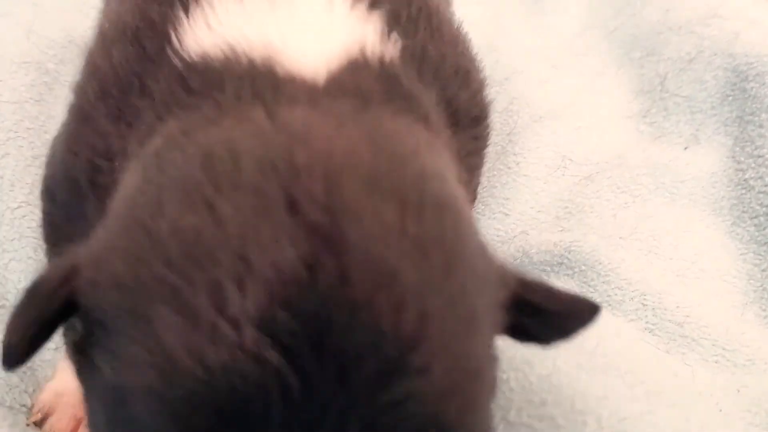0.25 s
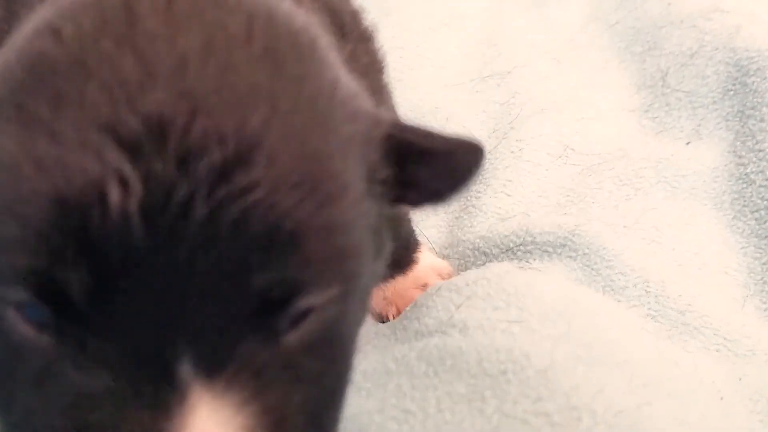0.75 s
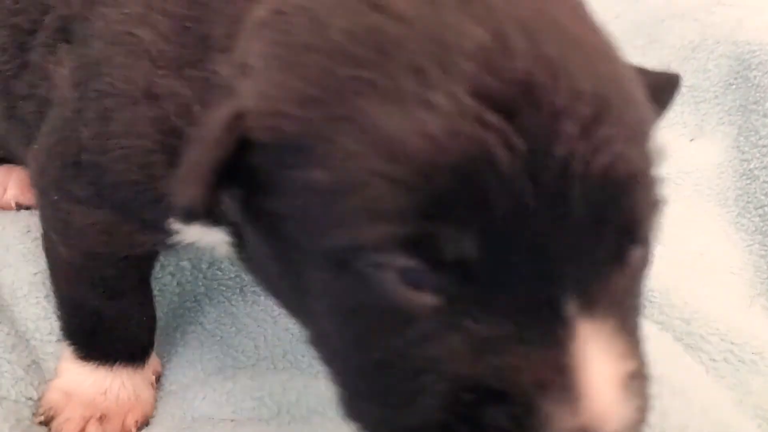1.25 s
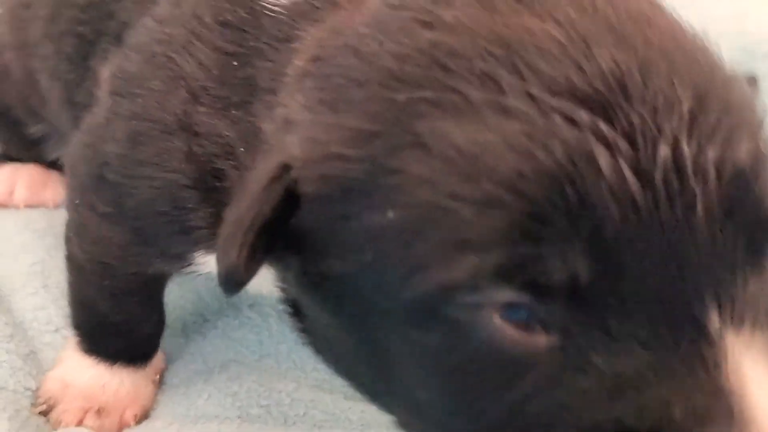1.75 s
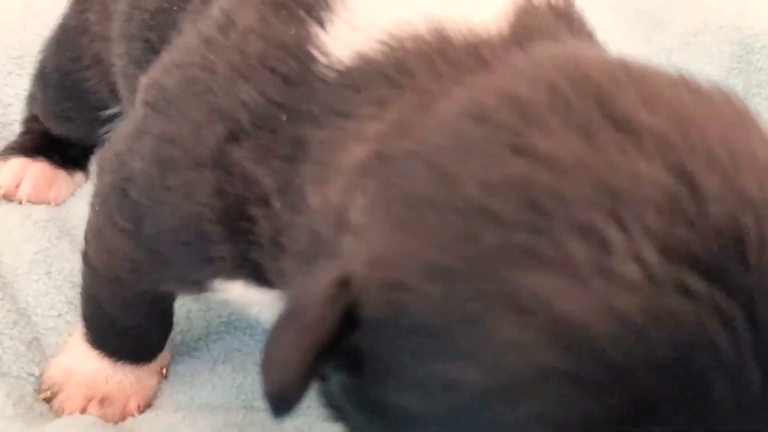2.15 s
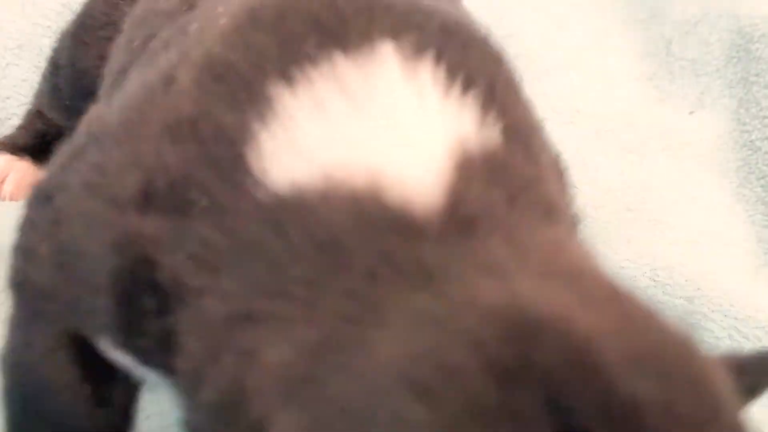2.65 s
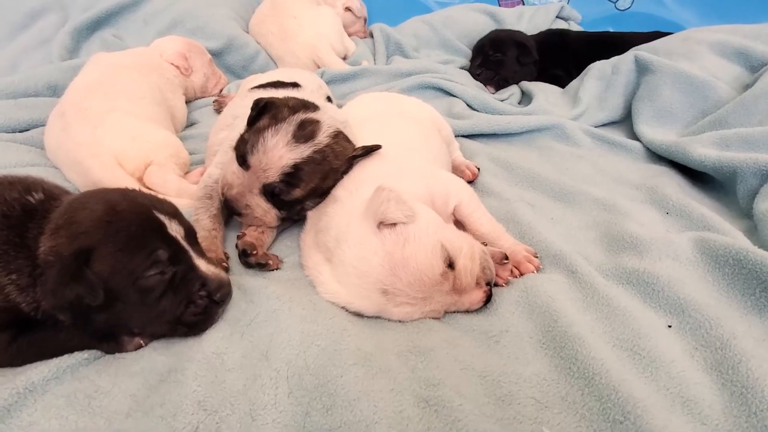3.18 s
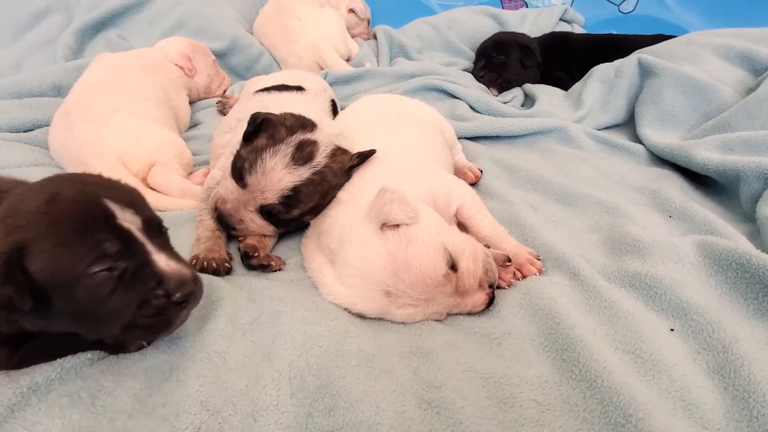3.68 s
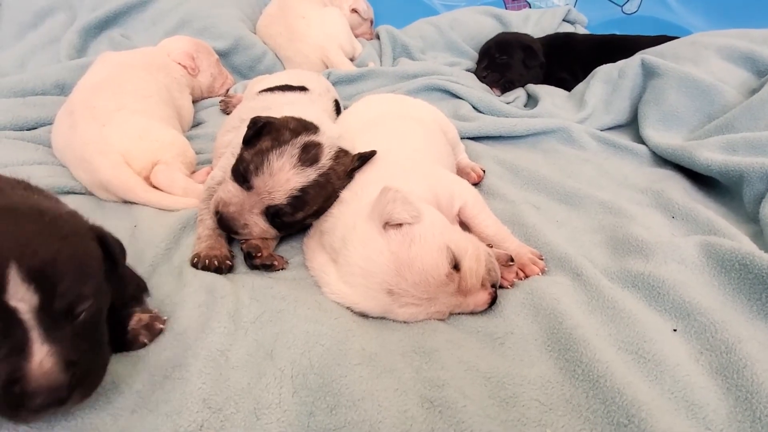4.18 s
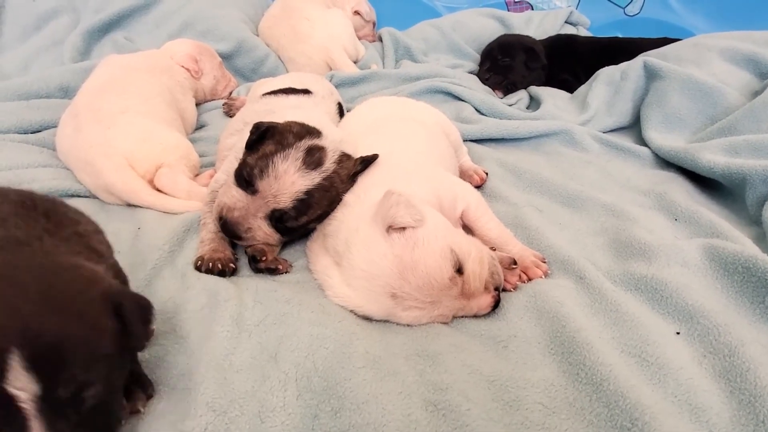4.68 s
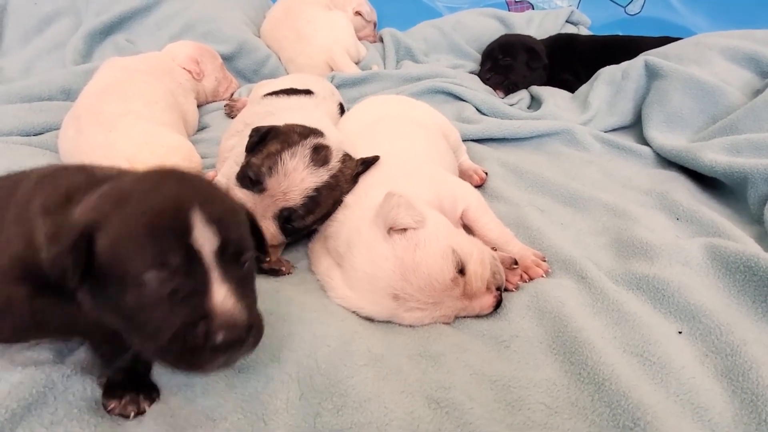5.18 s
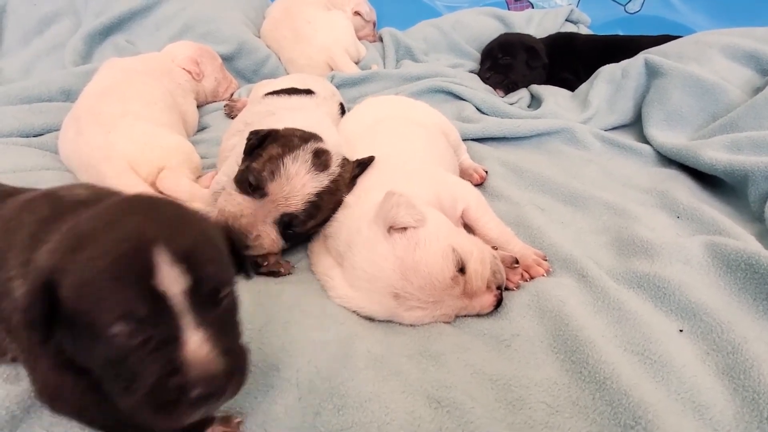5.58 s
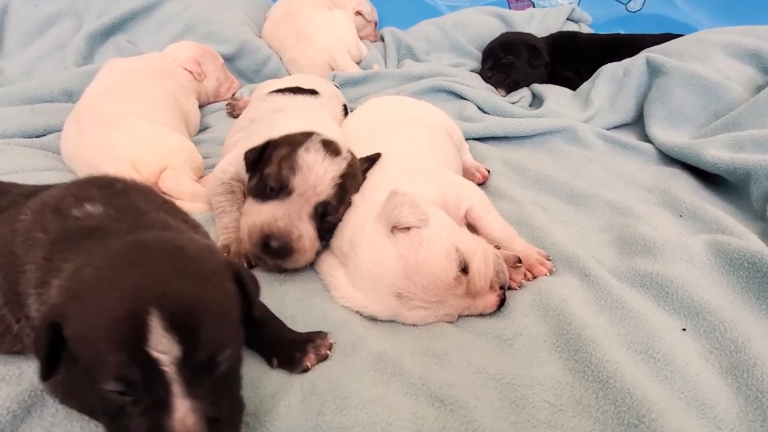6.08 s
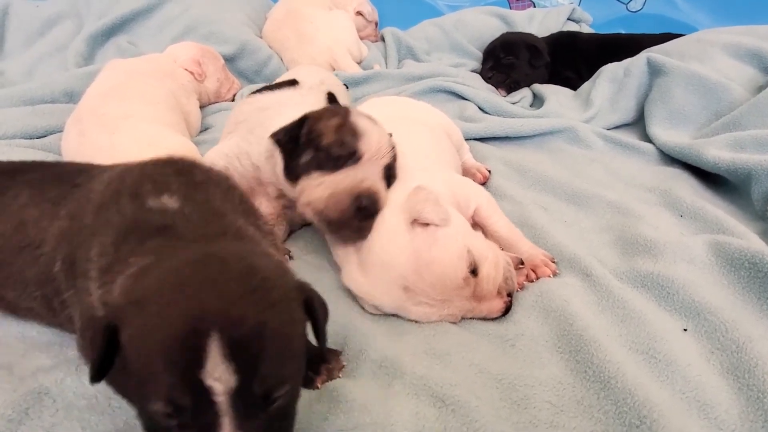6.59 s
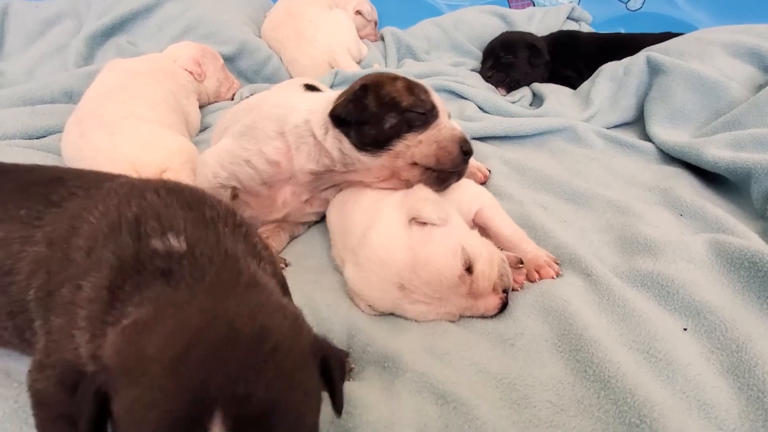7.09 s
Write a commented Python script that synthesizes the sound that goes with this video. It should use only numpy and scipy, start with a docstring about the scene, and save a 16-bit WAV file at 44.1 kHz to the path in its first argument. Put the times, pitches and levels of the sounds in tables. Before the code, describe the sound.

Tiny puppies on a fleece blanket indoors, miked at close range. First come shrill, trembling cries around a thousand hertz with throaty croaks, brief squeaks and breathy hoarse air. After an abrupt tiny gap it turns much quieter: nasal sniffing puffs about four times a second, occasional little whimpered yips, blanket rustle, and muffled thuds that grow stronger near the end, with a short room echo.

```python
"""Five high wavering cries of a newborn puppy, heard very close, while another creaks and squeaks hoarsely.
After a brief break in the sound a puppy whimpers in short yips, amid hisses of air through the nose.
Voices are sums of harmonics or pulses through resonances; air is filtered noise; ticks are ringing bursts.
Dull thuds and the rubbing of a fleece blanket are swelling noise, over low hums, room hiss and a short echo."""
import sys
import numpy as np
from scipy import signal
from scipy.fft import rfft, irfft, next_fast_len
from scipy.io import wavfile

SR = 44100
rng = np.random.default_rng(int(sys.argv[2]) if len(sys.argv) > 2 else 0)


def dump(signal):
    """Clip the signal to [-1, 1] and save it as 16-bit WAV at the path in sys.argv[1]."""
    limited = np.clip(np.atleast_2d(signal).T, -1, 1)
    pcm = np.round(limited * 32767).astype(np.int16)
    wavfile.write(sys.argv[1], SR, pcm)


N = 323694
TIME = np.arange(N) / SR
CUTOFF_HZ = 15900   # top of the audible band kept
FADE_DB = 30        # attacks and releases are timed over this range


def from_db(db):
    """Logarithmic level: decibels to amplitude gain."""
    return 10 ** (np.asarray(db) / 20)


def rms_one(x):
    """Normalisation: scale to unit power."""
    return x / np.sqrt(np.mean(x ** 2) + 1e-20)


def in_time(rows, t=TIME):
    """Linear interpolation: each column of a curve against its first column."""
    knots, *columns = np.transpose(rows)
    return [np.interp(t, knots, column) for column in columns]


def gain_at(points, hz):
    """Spectral envelope: gain interpolated in dB over log frequency."""
    f, db = np.transpose(points)
    return from_db(np.interp(np.log(hz + 1), np.log(f), db))


def butter(x, hz, kind, order=2):
    """Causal filtering with a maximally flat passband."""
    return signal.sosfilt(signal.butter(order, hz, kind, fs=SR, output="sos"), x)


def wobble(count, hz):
    """Random modulation: noise low-passed at hz, with spread near 1."""
    slow = butter(rng.standard_normal(count + SR // 2), hz, "low")
    return rms_one(slow[SR // 4:])[-count:]


def resonate(x, hz, width_hz):
    """Damped resonance: a pole pair with gain 1 at its peak."""
    r = np.exp(-np.pi * width_hz / SR)
    zeros = np.array([1, 0, -1]) * (1 - r * r) / 2
    poles = [1, -2 * r * np.cos(2 * np.pi * hz / SR), r * r]
    return signal.lfilter(zeros, poles, x + 1e-18)


def noise(spectrum, alike):
    """Interchannel correlation: coloured mid and side noises mixed to a left-right likeness; overall rms 1."""
    hz = np.arange(N // 2 + 1) * SR / N
    mid, side = irfft(rfft(rng.standard_normal((2, N))) * gain_at(spectrum, hz), N)
    return rms_one(np.sqrt(1 + alike) * mid + np.sqrt(1 - alike) * side * [[1], [-1]])


def add(track, start_s, sound):
    """Superposition: mix a sound into a track."""
    at = max(round(start_s * SR), 0)
    track[at:at + len(sound)] += sound[:N - at]


def gate(t, start, end, edge_s):
    """Smooth switching: opens at start and closes at end along sine-squared edges."""
    return np.sin(np.pi / 2 * np.clip(np.minimum(t - start, end - t) / edge_s + .5, 0, 1)) ** 2


def swells(rows, attack_s, release_s):
    """Exponential envelope: each gesture sets in, changes evenly in dB to its final level and dies away."""
    out = np.zeros(N)
    for start, end, level_db, swell_db in rows:
        corners = [start - attack_s, start, end, end + release_s]
        t = np.arange(max(corners[0], 0), corners[-1], 1 / SR)
        course_db = np.interp(t, corners, [-swell_db - FADE_DB, -swell_db, 0, -FADE_DB])
        add(out, t[0], from_db(level_db + course_db))
    return out


# Colour of the room hiss. Each row: frequency in Hz, relative level in dB.
HISS_SPECTRUM = [(88, -33.5), (150, -4), (361, -13.5), (589, -10.5), (1190, -24.5), (1940, -24),
                 (4580, -30.5), (6770, -23.5), (11500, -31), (13700, -31.5), (16000, -27.5)]


def room_hiss():
    """Diffuse field: the steady hiss of a still room, nearly independent left and right."""
    return from_db(-72.5) * noise(HISS_SPECTRUM, alike=0.2)


def mains_hum():
    """Pure tone: a faint steady mains hum at 120 Hz."""
    return from_db(-75) * np.sin(2 * np.pi * 120 * TIME)


def low_hum():
    """Slow frequency and amplitude modulation: a wavering hum near 71 Hz, stronger right and growing midway."""
    level_db = np.interp(TIME, [2.7, 5.3], [-72, -64]) + 2 * wobble(N, 3)
    pitch = 71.4 + .8 * wobble(N, 4)
    tone = np.sin(2 * np.pi * np.cumsum(pitch) / SR)
    return from_db(level_db) * tone * from_db([[-4], [3]])   # left, right


# Dull low thuds, like breath puffing on the microphone.
# Each row: start in seconds, level in dB before the left-right balance.
THUDS = [(.26, -69), (.53, -68), (.65, -61), (1.16, -55), (1.73, -51.5), (2.0, -58), (2.179, -56.5),
         (2.42, -71), (2.721, -55), (3.21, -49), (4.491, -69), (4.71, -60.5), (6.079, -65), (6.73, -54),
         (6.961, -47.5), (7.14, -49), (7.24, -56)]
# Low rumble under the thuds, growing overall towards the end.
# Each row: time in seconds, level in dB before the left-right balance.
RUMBLE_LEVEL = [(0, -78), (2.9, -71.5), (4.6, -75), (5.4, -69), (7.34, -65)]
# Colour of thuds and rumble. Each row: frequency in Hz, relative level in dB.
RUMBLE_SPECTRUM = [(15, -43), (25, -22.5), (51, 7), (78, 5), (130, -5.5), (200, -17.5), (260, -47.5),
                   (440, -120)]


def thuds_and_rumble():
    """Envelope-shaped noise: dull low-frequency bursts over a continuous rumble."""
    gestures = [(start, start + 0.01, level_db, 0) for start, level_db in THUDS]
    bursts = swells(gestures, attack_s=0.036, release_s=0.11)
    strength = bursts + from_db(in_time(RUMBLE_LEVEL)[0])
    return strength * noise(RUMBLE_SPECTRUM, alike=0.646) * from_db([[-4], [2.5]])   # left, right


# Paws and bellies on the fleece. Each row: start and end in seconds, final level in dB, swell in dB.
RUBS = [(2.8, 3.0, -74, -0.5), (3.2, 3.3, -75, -14), (3.56, 3.65, -71.5, -7.5), (3.9, 3.98, -75, -5),
        (4.7, 4.95, -70, 2.5), (5.08, 5.23, -66.5, 10.5), (7.13, 7.3, -69, -7)]
# Colour of the rubbing. Each row: frequency in Hz, relative level in dB.
RUBBING_SPECTRUM = [(88, -23), (150, 2.5), (469, -9), (846, -14), (912, -26.5), (1960, -29.5), (2140, -27),
                    (3000, -35.5), (3900, -62), (6600, -120)]


def fleece_rubbing():
    """Friction noise: irregular contact makes the rustle patchy."""
    patchy = from_db(3 * wobble(N, 21))
    return swells(RUBS, attack_s=.15, release_s=0.2) * patchy * noise(RUBBING_SPECTRUM, alike=0.85)


# Claw and mouth ticks. Each row: start in seconds, peak level in dB, ringing frequency in Hz.
TICKS = [(0.38, -50.5, 6950), (0.417, -41, 7230), (2.779, -48, 5560), (2.846, -46.5, 11000),
         (3.558, -40.5, 10100), (3.576, -54, 7240), (3.606, -57, 5900), (3.689, -51.5, 7650),
         (3.959, -54, 7600), (4.102, -50.5, 9030), (5.174, -65, 7100), (5.204, -47, 7700)]


def ticks(decay_s, width_hz):
    """Impulse response: a tiny noise burst rings one broad high resonance."""
    out, t = np.zeros(N), TIME[:SR // 50]
    for start, peak_db, hz in TICKS:
        burst = rng.standard_normal(len(t)) * np.exp(-t / decay_s)
        snap = resonate(burst, hz, width_hz)
        add(out, start, from_db(peak_db) * snap / np.abs(snap).max())
    return out


# Puffs through the nose. Each row: start and end in seconds, final level in dB, swell in dB.
NOSE_AIR = [(2.84, 2.89, -59, 7.5), (3.02, 3.22, -56, 19.5), (3.43, 3.59, -59, 8.5), (3.80, 3.89, -62, 6),
            (4.11, 4.16, -64.5, 0), (4.36, 4.39, -75, 3), (4.54, 4.58, -73, 6), (4.82, 4.86, -75, -6),
            (5.05, 5.10, -56.5, 7.5), (5.36, 5.45, -61, 4.5), (5.63, 5.71, -58, 8), (5.91, 5.99, -65, -3.5),
            (6.16, 6.22, -57.5, 9), (6.39, 6.445, -51.5, 16), (6.64, 6.735, -53, 10.5),
            (6.90, 6.955, -57.5, 11), (7.15, 7.17, -68, -3), (7.25, 7.30, -71, -4)]
# Colour of nose air. Each row: frequency in Hz, relative level in dB.
NOSE_SPECTRUM = [(1470, -11), (2500, -8.5), (2700, -55.5), (3260, -20), (4880, -18.5), (5190, -30),
                 (5520, -4.5), (6400, 6.5), (7950, -6), (9730, 5), (10900, -7), (12300, -3), (13500, -15),
                 (15200, -2), (16000, -23)]


def nose_air():
    """Turbulence: puffs of air hiss through the nose, nearly independent left and right."""
    return swells(NOSE_AIR, attack_s=0.035, release_s=0.02) * noise(NOSE_SPECTRUM, alike=0.066)


# Air forced through hoarse throats. Each row: start and end in seconds, final level in dB, swell in dB.
THROAT_AIR = [(0, .015, -53, -1), (.14, .285, -48, 7), (.51, .83, -53.5, -2), (.97, 1.19, -51.5, -1.5),
              (1.40, 1.765, -64, -10), (1.98, 2.13, -50.5, 2.5), (2.28, 2.33, -54.5, 7),
              (2.40, 2.70, -49, 1)]
# Colour of throat air. Each row: frequency in Hz, relative level in dB.
HOARSE_SPECTRUM = [(880, -14), (1500, -21), (2040, -2), (2590, -9.5), (3770, -31.5), (4370, -26),
                   (5380, -25.5), (6960, -9), (8400, -29.5), (10100, -19), (12900, -23.5), (14100, -33.5),
                   (16000, -29)]


def throat_air():
    """Turbulence: air forced through the hoarse throats hisses in slow swells."""
    return swells(THROAT_AIR, attack_s=0.085, release_s=.08) * noise(HOARSE_SPECTRUM, alike=0.036)


# Slack-fold creaks. Each row: start and end in seconds, first and last pulse rate per second, level in dB.
CREAKS = [(0.089, 0.204, 218, 325, -51.5), (0.219, 0.293, 176, 323, -38.5), (0.47, 0.553, 136, 237, -42),
          (0.76, 0.835, 156, 387, -39.5), (0.931, 0.97, 200, 396, -45.5), (1.069, 1.141, 182, 270, -42),
          (1.344, 1.449, 163, 335, -42.5), (1.666, 1.748, 140, 320, -41.5), (1.93, 2.062, 193, 356, -43),
          (2.254, 2.321, 139, 397, -42.5), (2.355, 2.403, 170, 404, -42)]
# Resonances of the creaking throat. Each row: frequency in Hz, width in Hz, level in dB.
CREAK_MODES = [(310.8, 200, -4), (583, 150, -2), (900, 115, 7), (2400, 330, -6), (6470, 1100, -12)]


def creaks(jitter, uneven_db, rasp, swell_db):
    """Pulse excitation: slack folds slap unevenly, faster and harder with strain, each slap puffing air."""
    out = np.zeros(N)
    for start, end, first_rate, last_rate, level_db in CREAKS:
        size = int((end - start) * SR)
        rate = np.linspace(first_rate, last_rate, size) * np.exp(jitter * wobble(size, 150))
        cycles = np.cumsum(rate) / SR
        slaps = butter(np.diff(np.floor(cycles), prepend=-1), 1300, "low", order=1)   # soft contact
        puffs = rng.standard_normal(size) * np.exp(-2 * (cycles % 1))
        strain_db = uneven_db * wobble(size, 120) - swell_db * np.linspace(1, 0, size) ** 3
        strain = from_db(strain_db) * signal.windows.tukey(size, .25)
        flow = (rms_one(slaps) + rasp * rms_one(puffs)) * strain
        flow = np.pad(flow, (0, SR // 100))   # time to ring out
        voice = 0
        for k, (hz, width_hz, db) in enumerate(CREAK_MODES):
            voice = voice + (-1) ** k * from_db(db) * resonate(flow, hz, width_hz)
        # the nose absorbs these bands
        voice = voice - 0.47 * resonate(voice, 1600, 720) - 1.1 * resonate(voice, 3600, 1800)
        add(out, start, from_db(level_db) * rms_one(butter(voice, 98, "high")))
    return out


# Throat spectrum shared by squeaks and cries. Each row: frequency in Hz, relative level in dB.
THROAT = [(500, 26), (1200, -15), (1500, -5.5), (2100, -0.5), (2550, -8.5), (3000, -12.5), (3800, -25),
          (4300, -23.5), (5200, -32.5)]
# Squeaks among the cries. Each row: start and length in seconds, first and last pitch in Hz,
# fundamental level in dB, overtone level in dB before throat shaping.
SQUEAKS = [(0, .010, 629, 597, -42, -10), (.130, 0.076, 546, 711, -47, -1),
           (.271, 0.016, 909, 760, -33.5, -18.5), (.538, 0.036, 530, 746, -38, -28),
           (.725, 0.025, 855, 855, -30, -26), (.829, .019, 676, 897, -32, -15.5),
           (1.048, 0.017, 916, 846, -44, -40), (1.110, 0.026, 558, 840, -35, -28),
           (1.175, 0.026, 1035, 1013, -31.5, -5), (1.440, 0.014, 738, 910, -34, -23),
           (1.720, 0.022, 577, 840, -38, -4.5), (1.754, 0.011, 939, 893, -28.5, -13),
           (1.990, 0.096, 989.6, 857.4, -38, -8), (2.064, .023, 847, 845, -29.5, -18.5),
           (2.314, 0.017, 738, 864, -34.5, -16.5), (2.497, 0.031, 967, 1062, -32.5, -9.5),
           (2.582, 0.01, 890, 813, -47, -39.5), (2.619, 0.013, 980, 694, -33.5, -39),
           (2.674, 0.023, 962.5, 1009, -26.5, -9)]
# Whimpered yips. Each row: start and length in seconds, first and last pitch in Hz,
# fundamental level in dB, overtone level in dB before throat shaping; a later high-pass trims the lows.
YIPS = [(3.174, 0.028, 881, 960, -33.5, -16.5), (3.198, .017, 876, 818, -36, -9),
        (3.569, .014, 754, 583, -40.5, -13), (3.884, .017, 725, 589, -48.5, -16),
        (4.132, 0.043, 544, 414.4, -59, -15.5), (5.436, 0.015, 572, 483, -43.5, -15.5),
        (5.686, .019, 365, 548, -47, -9), (5.969, 0.015, 754, 592, -41, -17),
        (6.201, .019, 528.5, 474, -36.5, -5.5), (6.420, 0.0386, 405, 488, -40, -3),
        (6.679, 0.023, 592.3, 627.4, -33.5, -5.5), (6.937, .024, 824, 415, -36.5, -10)]


def squeaks(rows, fall_db, jitter, count=6):
    """Harmonic series: the folds catch briefly and slide in pitch; overtones fall stepwise, then the throat shapes."""
    out = np.zeros(N)
    for start, length, first_hz, last_hz, level_db, overtones_db in rows:
        size = int(length * SR)
        pitch = np.linspace(first_hz, last_hz, size) * (1 + jitter * wobble(size, 300))
        phase = 2 * np.pi * np.cumsum(pitch) / SR
        tone = np.sin(phase)
        for k in range(2, count + 1):
            overtone = from_db(overtones_db - fall_db * (k - 2.5)) * gain_at(THROAT, k * pitch)
            tone += overtone * np.sin(k * phase)
        # 0.6 of each squeak is spent fading in and out
        add(out, start, np.sqrt(2) * from_db(level_db) * tone * signal.windows.tukey(size, .6))
    return out


def cry(rows, treble, mouth_db, top_hz, jitter, shimmer_db, edge_s, count=16):
    """Source and filter: taut folds give a strong fundamental, throat-shaped overtones and a thin nasal treble.
    Each row: time in seconds, pitch in Hz, then fundamental, octave and treble in dB."""
    start, end = rows[0][0], rows[-1][0]
    t = np.arange(start - edge_s, end + edge_s, 1 / SR)
    pitch, base_db, octave_db, treble_db = in_time(rows, t)
    pitch = pitch * (1 + jitter * wobble(len(t), 190))
    k = np.arange(1, count + 1)[:, None]
    hz = k * pitch

    low = gain_at(THROAT, hz) / gain_at(THROAT, 2 * pitch) * (hz < THROAT[-1][0])
    low *= from_db(octave_db + mouth_db)
    low[0], low[1] = from_db(base_db), from_db(octave_db)

    top_fall = gain_at([(top_hz, 0), (2 * top_hz, -48)], hz)   # 48 dB down an octave above the top edge
    high = gain_at(treble, hz) * top_fall * (hz > treble[0][0]) * (hz < CUTOFF_HZ)
    high *= from_db(treble_db) / np.sqrt(np.sum(high ** 2, axis=0) + 1e-6)

    flutter = from_db(shimmer_db * np.array([wobble(len(t), 69.4) for _ in k]))
    partials = np.sin(2 * np.pi * (np.cumsum(hz, axis=1) / SR + rng.random((count, 1))))
    voice = np.sqrt(2) * np.sum((low + high) * flutter * partials, axis=0)
    out = np.zeros(N)
    add(out, t[0], voice * gate(t, start, end, edge_s))
    return out


# Whines that rise until they break into a yip. Each row: start and end in seconds, first and top pitch in Hz,
# final fundamental level in dB, treble relative to it in dB.
WHINES = [(3.153, 3.182, 1105, 1143, -43.5, -9.5), (6.631, 6.685, 866, 1037, -31.5, -17.5),
          (6.9, 6.938, 809, 848.6, -41, -27)]
# Colour of the whines' treble. Each row: frequency in Hz, relative level in dB.
WHINE_TREBLE = [(4800, 5), (5500, 23), (6700, 28.5), (8000, 9), (10000, -28), (13000, -13.5), (16000, -21)]


def whines(count=20):
    """Rising tension: pitch and level climb together, quickly at first, and level off at the end."""
    out, slack = 0, np.linspace(1, 0, count) ** 2
    for start, end, first_hz, top_hz, level_db, treble_db in WHINES:
        t = np.linspace(start, end, count)
        pitch = top_hz + (first_hz - top_hz) * slack
        effort = level_db - 21 * slack
        course = np.transpose([t, pitch, effort, effort - 9.5, effort + treble_db])
        out = out + cry(course, WHINE_TREBLE, mouth_db=-10.5, top_hz=7800,
                        jitter=0.0081, shimmer_db=3.0, edge_s=.005)
    return out


# The high cries. Each row: level midway in dB before onset and waver, swell from start to end in dB,
# octave and treble relative to the level in dB, open-mouth harmonics in dB, top edge in Hz.
CRIES = [(-41, 16, -5.5, -13.5, -5, 9900), (-38, 1.5, -1.5, -11.5, -5.5, 9640),
         (-37, 3.5, -5, -11.5, 2, 10400), (-35.5, 1, -4, -11.5, 2, 12600), (-35.5, 0, -6, -19, -7, 6750)]
# One pitch curve for each cry. Each row of a curve: time in seconds, pitch in Hz before jitter.
CRY_PITCH = [
    [(0.11, 1023), (0.134, 1080), (0.158, 1229), (0.17, 1279), (0.182, 1315), (0.2, 1231), (0.22, 1121),
     (0.25, 1136), (0.275, 1011)],
    [(0.505, 949), (0.515, 949), (0.521, 960), (0.547, 1106), (0.561, 1132), (0.611, 1009), (0.635, 1058),
     (0.727, 975)],
    [(0.965, 1048), (0.981, 1120), (1.001, 1239), (1.029, 1298), (1.061, 1234), (1.091, 1292),
     (1.177, 1229)],
    [(1.39, 986), (1.402, 1004), (1.426, 1159), (1.46, 1259), (1.496, 1103), (1.53, 1182), (1.608, 1064),
     (1.68, 953), (1.755, 1042)],
    [(2.385, 1010), (2.401, 1039), (2.431, 1169), (2.473, 1192), (2.571, 1227), (2.609, 1099),
     (2.639, 950.7), (2.661, 956), (2.691, 1008)],
]
# Colour of the cries' treble. Each row: frequency in Hz, relative level in dB.
CRY_TREBLE = [(4400, 1), (4800, 5), (5200, -23), (5900, 6), (7200, 10), (8500, 1.5), (10000, 6),
              (11000, 8.5), (12200, 10), (13200, -8.5), (16000, -20)]
# Colour of the closing rasp. Each row: frequency in Hz, relative level in dB.
RASP_SPECTRUM = [(3000, -4.5), (4600, -16), (6000, -1.5), (7300, 0), (8500, -5.5), (10000, -7.5),
                 (12300, -9.5), (14000, -32.5)]


def high_cries(count=100):
    """Common effort: fundamental, octave and treble swell and waver together; each cry ends in a nasal rasp."""
    onset_db, onset_s = 5, 0.012   # a cry starts this much weaker; time constant of finding its voice
    rasp_s, rasp_db = 0.015, -4.5   # length; level against the cry's treble
    out, rasps, waver_db = 0, [], 1.46 * wobble(N, 21.74)
    for curve, (level_db, swell_db, octave_db, treble_db, mouth_db, top_hz) in zip(CRY_PITCH, CRIES):
        t = np.linspace(curve[0][0], curve[-1][0], count)
        pitch = in_time(curve, t)[0]
        effort = level_db + swell_db * np.linspace(-.5, .5, count)
        effort = effort - onset_db * np.exp(-(t - t[0]) / onset_s) + np.interp(t, TIME, waver_db)
        course = np.transpose([t, pitch, effort, effort + octave_db, effort + treble_db])
        out = out + cry(course, CRY_TREBLE, mouth_db, top_hz, jitter=0.00588, shimmer_db=2.0, edge_s=.008)
        rasps.append((t[-1], t[-1] + rasp_s, level_db + treble_db + rasp_db, 0))
    return out + swells(rasps, attack_s=0.024, release_s=0.01) * noise(RASP_SPECTRUM, alike=1)[0]


def place(x, path):
    """Diffraction: sound bends round the microphone body and reaches two ports with different phase and strength."""
    lead, balance_db = in_time(path, np.arange(N // 2 + 1) * SR / N)
    left = from_db(balance_db / 2)
    right = from_db(-balance_db / 2) * np.exp(-1j * lead)
    return irfft(rfft(x) * np.array([left, right]), N)


def room(x, count=14):
    """Reverberation: sound circles between walls and is scattered; the treble dies sooner."""
    size = next_fast_len(N + SR)
    hz = np.arange(size // 2 + 1) * SR / size
    t60 = np.interp(hz, [1000, 8000], [.34, .26])   # seconds to fall 60 dB
    tail = 0
    for k, lap_s in enumerate(np.geomspace(.011, .053, count)):
        delay = np.exp(-2j * np.pi * hz * lap_s * [[1], [1.043]])   # laps differ left and right
        lap = from_db(-60 * lap_s / t60) * delay
        tail = tail + (-1) ** k * lap / (1 - lap)
    for scatter_s in (.0013, .0031, .0053):   # all-pass scattering
        turn = np.exp(-2j * np.pi * hz * scatter_s)
        tail = tail * (turn - .6) / (1 - .6 * turn)
    return from_db(-12) * irfft(rfft(x, size) * tail / np.std(tail), size)[:, :N]


# Paths to the two microphone ports, for the crier and for the others.
# Each row: frequency in Hz, left lead in radians, left minus right in dB.
CRIER_PATH = [(300, .4, -1), (1000, 2.05, 1.5), (1300, 2.3, 2), (2000, 5.5, -1), (2600, 5.7, -2),
              (3500, 6.6, 0), (6000, 12.5, 2), (7200, 14, 3), (7900, 18.8, 3), (9100, 19.2, 3),
              (10200, 25, 3), (12200, 31.4, 4)]
LITTER_PATH = [(200, 0.32, -0.14), (624, 0.29, 0.51), (900, 1.58, 0.87), (2260, 2.02, -0.031),
               (6500, 0.34, -2)]
# The brief break in the sound: its start and end in seconds.
BREAK_S = (2.757, 2.777)


def scene():
    """Superposition: background, then three voices with their air; the farther whimperer wakes more of the room."""
    background = thuds_and_rumble() + fleece_rubbing() + mains_hum() + low_hum() + room_hiss()

    whimperer = whines() + butter(squeaks(YIPS, fall_db=6.0, jitter=0.072), 260, "high")
    far = place(whimperer, LITTER_PATH) + nose_air()

    grumbler = creaks(jitter=.3, uneven_db=1.5, rasp=.5, swell_db=7.5)
    grumbler = grumbler + squeaks(SQUEAKS, fall_db=1, jitter=0.014)
    litter = place(grumbler + ticks(decay_s=0.0013, width_hz=2050), LITTER_PATH)
    near = place(high_cries(), CRIER_PATH) + litter + throat_air() * (TIME < BREAK_S[0])

    # no echo of the near sounds outlasts the break
    wet = room(near) * (TIME < BREAK_S[1]) + room(from_db(3.0) * far)
    return near + far + wet + background


def record(dry):
    """Gating and band limiting: the sound breaks off for an instant, and the top is cut steeply."""
    broken = dry * (1 - gate(TIME, *BREAK_S, edge_s=0.0025))
    return signal.sosfilt(signal.ellip(10, .2, 80, CUTOFF_HZ, fs=SR, output="sos"), broken)


dry = scene()
out = record(dry)
dump(out)
```